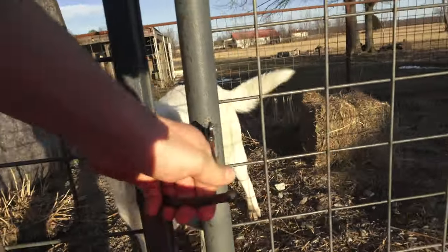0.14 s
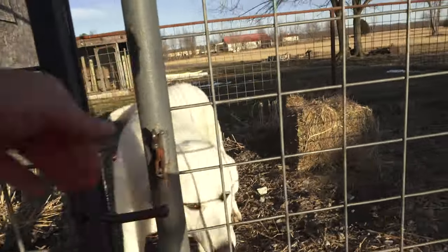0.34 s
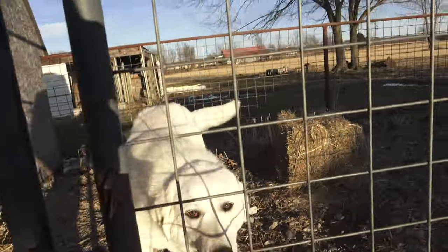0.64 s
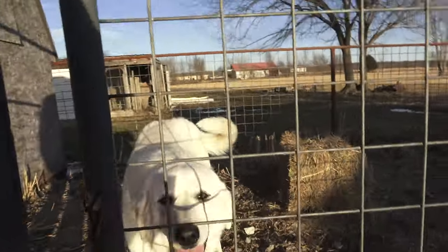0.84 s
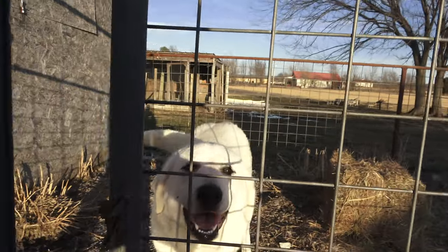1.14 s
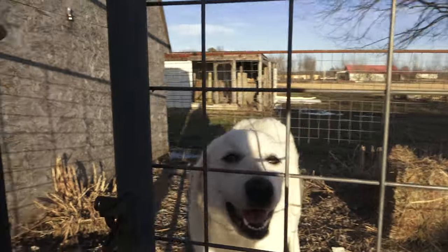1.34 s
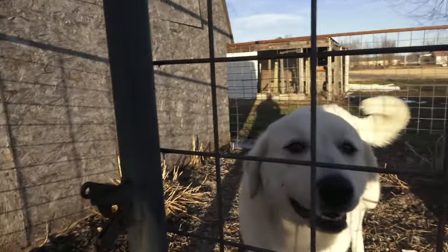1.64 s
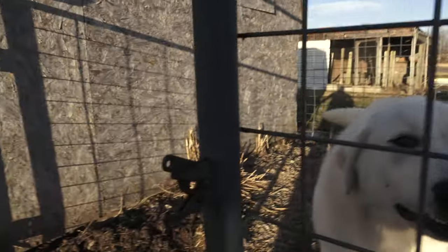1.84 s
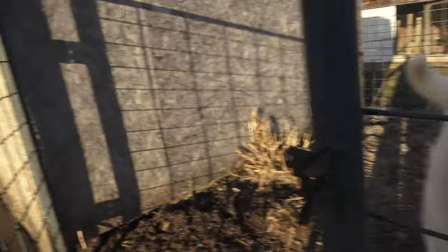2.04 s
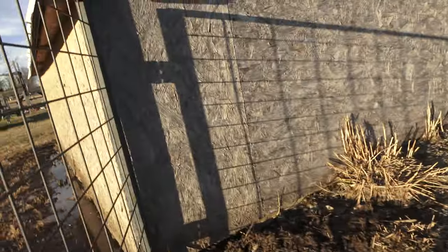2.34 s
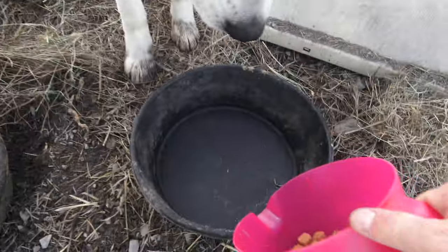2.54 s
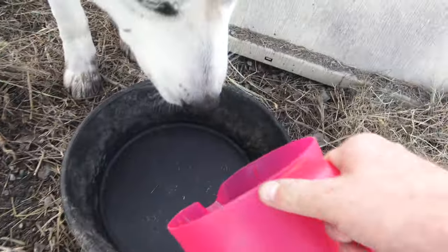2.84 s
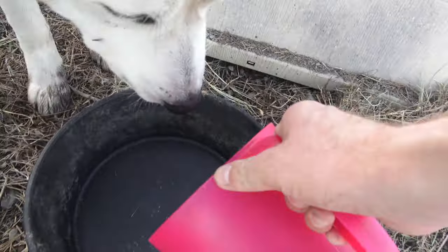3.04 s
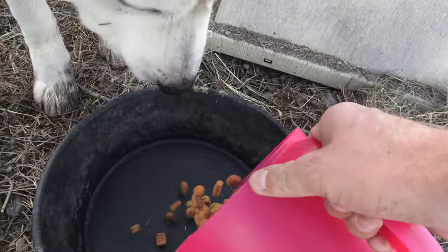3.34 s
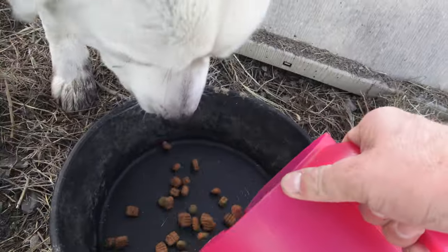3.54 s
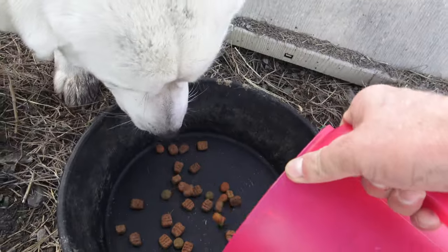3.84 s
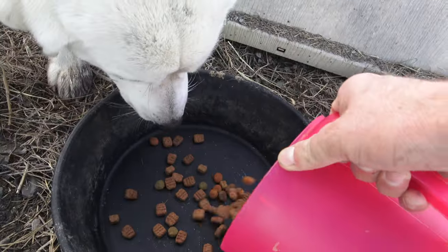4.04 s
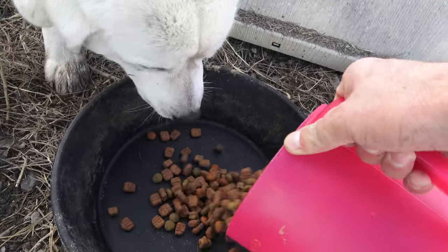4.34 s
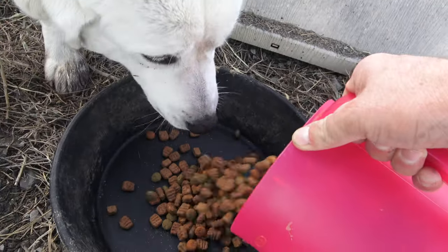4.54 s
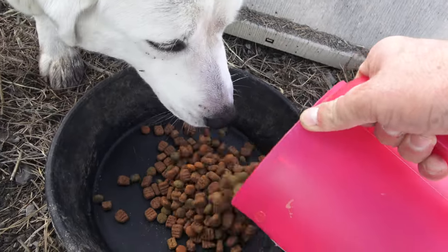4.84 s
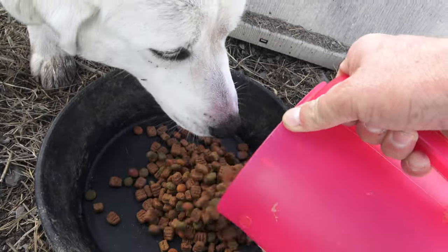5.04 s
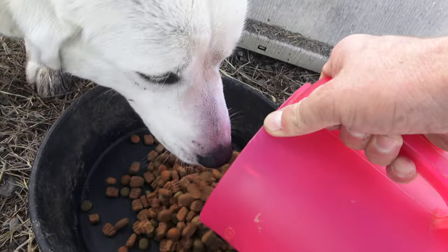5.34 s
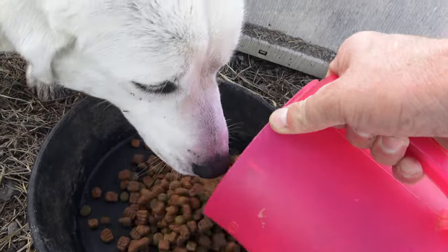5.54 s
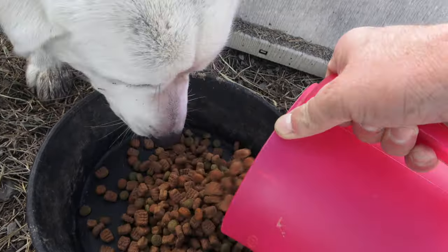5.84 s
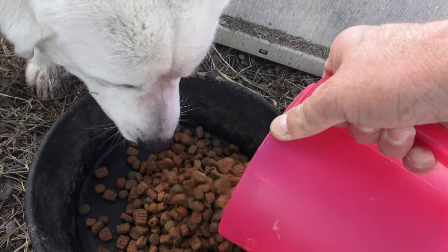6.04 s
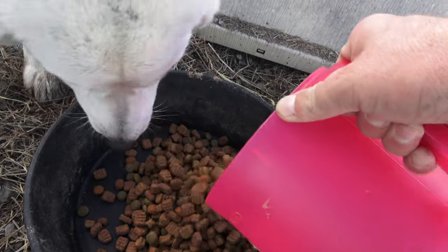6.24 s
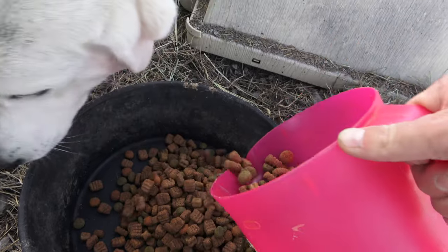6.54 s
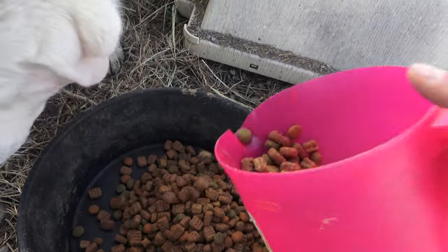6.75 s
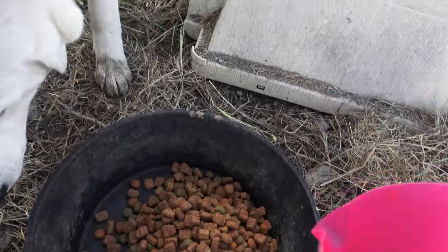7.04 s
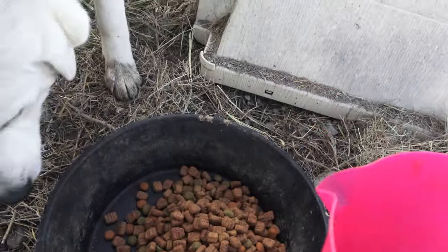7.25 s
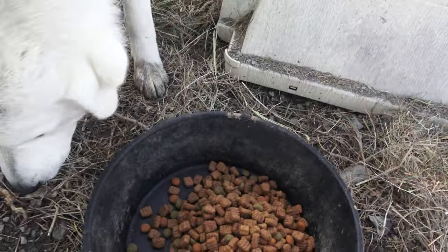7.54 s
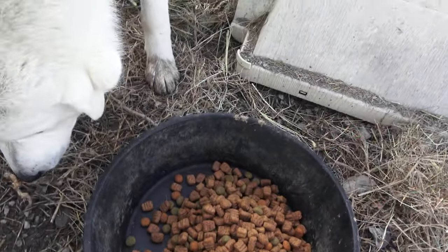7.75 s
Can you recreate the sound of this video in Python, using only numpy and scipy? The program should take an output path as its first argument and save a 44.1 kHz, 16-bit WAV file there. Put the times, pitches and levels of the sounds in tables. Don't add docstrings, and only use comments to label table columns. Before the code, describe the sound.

Outdoors, close handheld microphone with wind rumble and buffets. Dry pellets shake in a plastic scoop, a steel latch drops with a short clack, and more jolts rattle the load. The scoop tips with sharp plastic clacks, then pellets pour into a rubber pan, first as separate dull thuds, then a dense crunchy rattle that thins out. The scoop lifts away and the remaining pellets slide back inside it.

```python
import sys
import numpy as np
from scipy import signal
from scipy.fft import rfft, irfft, next_fast_len
from scipy.io import wavfile
from scipy.ndimage import uniform_filter1d

SR = 44100
rng = np.random.default_rng(int(sys.argv[2]) if len(sys.argv) > 2 else 0)


def log_audio(samples):
    frames = np.atleast_2d(samples).T
    limited = np.clip(frames, -1, 1)
    pcm = np.round(limited * 32767).astype(np.int16)
    wavfile.write(sys.argv[1], SR, pcm)


def to_linear_factor(level_db):
    exponent = np.asarray(level_db, float) / 20
    return 10 ** exponent


N = 347447

# t/s, level/dB
BREEZE = [(0, -30), (1.2, -28), (1.5, -27), (2.0, -34), (2.5, -30.5), (2.9, -36), (3.9, -35.5), (4.9, -46),
          (5.5, -46.5), (6.9, -43.5), (7.88, -41.5)]
# t/s, hold/s, level/dB
GUSTS = [
    (.13, 0.049, -9.5),
    (1.17, 0.0087, -2.5),
    (1.65, 0.083, -18),
    (1.79, 0.018, -12.5),
    (1.99, 0.018, -14.5),
]
# t/s, hold/s, level/dB
SWAYS = [
    (1.8, 0.019, -8),
    (2.1, 0.26, -11),
    (2.6, 0.11, -10.5),
    (5.08, .01, -21),
]
# t/s, hold/s, level/dB
GRIP_KNOCKS = [
    (0, 0.0042, -9.5),
    (3.93, 0.032, -27),
    (7.31, 0.0098, -26),
]
# f/Hz, level/dB
YARD_SPECTRUM = [(59, -54), (100, -16), (150, -7.5), (206, -6.5), (471, -11), (705, -17), (1230, -23.5),
                 (4200, -35.5), (16000, -57)]
# t/s, level/dB
YARD_FADE = [(5.5, 4.5), (7.88, -9)]
# start t/s, end t/s, f/Hz, width/Hz, level/dB
HUMS = [
    (0, 0.504, 2030, 200, -42),
    (0.093, 1.15, 235.2, 2.7, -42),
    (4.6, 7.95, 138.3, 4.2, -48.5),
]
# t/s, level/dB
LATCH = [
    (.447, -5.5),
]
# f/Hz, level/dB, t60/s
LATCH_BAR = [(1060, 8.5, 0.0069), (1640, -8, 0.024), (2120, -2, 0.017), (2550, 1, 0.015), (3400, -7, 0.018)]

# f/Hz, level/dB, t60/s
PAN = [(435, -4, 0.04), (452, -1, 0.044), (516, 5.5, 0.034), (580, 3, 0.039), (650, -3.5, 0.037),
       (750, -5, 0.0083), (772, -1.5, 0.032), (900, -24, 0.016)]
# f/Hz, level/dB, t60/s
SCOOP = [(554, -11, 0.047), (652, -1.5, 0.02), (705, -2, 0.018), (792, 1.5, 0.025), (830, -11.5, 0.04),
         (982, -19, 0.058)]
# f/Hz, t60/s
SCOOP_AIR = (316, 0.096)
# f/Hz, level/dB, t60/s
WALL = [(1270, -3.5, 0.012), (1556, 5, 0.0048), (1920, -2.5, 0.011), (2306, 5, 0.0047), (2650, -5.5, 0.014),
        (2970, 2, 0.0054), (3300, 1.5, 0.0068), (3820, 1, 0.004), (4370, -1, 0.0042), (5090, 3.5, 0.0026)]
# f/Hz, level/dB, t60/s
TICK = [(5900, 2.5, 0.0011), (8240, -13, 0.0023), (10700, 0, 0.0005), (13400, -26, 0.001)]

# t/s, level/dB
BUMPS = [
    (0.246, -5.5),
    (1.087, -8.5),
    (1.532, -9),
    (2.298, -17),
    (6.88, -2.5),
]
# t/s, peak level/dB
SNAPS = [(3.0816, -25), (3.12, -21.5), (3.191, -23), (3.3384, -20), (3.36, -13), (3.3954, -19),
         (3.421, -14), (3.433, -19), (3.4715, -21), (3.4907, -19), (3.5505, -11), (3.6129, -12.5),
         (3.629, -15), (3.713, -24), (3.746, -22), (3.757, -16), (3.8205, -31), (3.833, -20), (3.9087, -12),
         (3.9425, -20), (4.006, -27), (4.0657, -13.5), (4.1607, -22), (4.1873, -9), (4.1995, -15),
         (4.267, -25), (4.242, -15), (4.359, -11), (4.428, -8), (4.453, -7.5), (4.5745, -13.5),
         (4.5927, -16), (4.607, -9), (4.6528, -8), (4.679, -11), (4.74, -19), (4.7818, -17), (4.79, -8.5),
         (4.8448, -7.5), (5.0176, -17), (5.146, -19), (5.1663, -14), (5.2276, -22), (5.3028, -8),
         (5.3515, -17), (5.395, -12), (5.785, -15), (6.207, -14), (6.435, -16), (6.459, -25), (6.494, -17),
         (6.6392, -14.5), (6.7065, -23), (6.88, -28), (7.121, -9), (7.386, -45), (1.232, -26),
         (1.8305, -19), (1.878, -19), (1.8908, -12), (2.0365, -28), (2.0914, -31.5), (2.7638, -20),
         (1.371, -11)]
# t/s, peak level/dB
THINNING = [(5.4394, -27), (5.53, -22), (5.6194, -20), (5.6391, -30), (5.7249, -25), (5.8506, -27),
            (5.949, -18), (6.0294, -19), (6.077, -25), (6.1095, -25), (6.1593, -17), (6.2692, -25),
            (6.2967, -25), (6.353, -18), (6.385, -19), (6.3924, -25), (6.6214, -30), (6.7804, -34),
            (6.79, -33), (6.8065, -25), (6.8272, -20)]
# t/s, thud peak level/dB, tick level/dB re thud
DROPS = [(3.368, 8, -23), (3.397, 2.5, -28), (3.435, -2, -30), (3.468, 4, -30), (3.507, 3.5, -27),
         (3.576, -1.5, -17), (3.624, 5, -28), (3.712, 2.5, -33), (3.789, -3, -38), (3.836, 4.5, -16.5),
         (3.907, 5.5, -35), (3.942, 2.5, -36), (4.006, 7.5, -27), (4.052, 1, -28), (4.078, 7, -29),
         (4.142, 1, -28), (4.162, -9, -26), (4.258, 3.5, -35), (4.298, 0, -33), (4.39, 4, -22),
         (4.63, 3.5, -23), (4.665, 0, -27), (4.7654, 5, -31), (3.721, 1, -34), (3.664, -3, -31),
         (3.556, 0, -26), (3.643, 2, -21), (5.478, -3.5, -50), (5.68, -0.5, -34), (5.825, -2.5, -44),
         (6.271, -4.5, -29), (6.659, -5, -27), (6.991, -8, -9), (7.069, -0.5, -38)]
# t/s, peak level/dB
LANDINGS = [(3.403, 2), (3.454, 4.5), (3.545, -3.5), (3.696, -7), (4.022, 0), (4.031, -3), (4.042, 1),
            (4.098, -5), (4.174, 1), (4.2, 5), (4.222, -4), (4.239, -3), (4.277, -4), (4.308, -2),
            (4.437, -5), (4.496, 0), (4.538, 0.5), (4.587, -11), (4.805, -2.5), (4.829, -9), (4.849, 0),
            (5.04, -5), (5.195, -2), (5.24, 0), (5.364, -20), (5.391, -9), (5.547, -3), (5.736, -3),
            (5.768, -6.5), (5.802, -13.5), (5.919, -3.5), (6.123, -4.5), (6.141, -6), (6.352, -9.5),
            (6.418, -9), (6.475, -10), (6.554, -7), (6.572, -12), (6.711, -6.5), (7.02, -24),
            (7.035, -10.5), (7.119, -12)]
# t/s, clack peak level/dB, clack f/Hz, thud and tick level/dB re clack
CARRY = [(0.4337, -15, 2560, -14, -12), (0.6983, -16, 2430, -19, -15), (0.7642, -21, 4360, 9, 1),
         (0.8066, -13, 1370, 5, -9), (0.821, -7, 2500, 1, -21), (1.729, -7.5, 2420, -24, -30),
         (2.14, -25, 1460, 3, -28)]
TIPPING = [(2.5988, -0.5, 3620, 0, -6.5), (2.64, -0.5, 3100, -4, -8.5), (2.6571, -1.5, 3480, -2.5, -17),
           (2.678, -9, 3040, -4, -28), (2.7905, -5.5, 2900, -6, -31), (2.835, -2, 3020, -4.5, -13),
           (2.8691, -10, 2900, 3, -36.5), (2.897, -14.5, 2650, 4, -32.5), (2.9692, -10, 1560, 4.5, -26),
           (3.0151, -7, 1620, 7.5, -39), (3.061, 0, 2590, 5, -36), (3.1053, -3.5, 3200, 6, -41),
           (3.1208, 1, 1920, -1, -11.5), (3.1909, 1.5, 2960, -23, -23), (3.206, 3.5, 3150, -22, -13),
           (3.223, -1, 3000, -21, -22), (3.247, 0.5, 2970, -35, -20), (3.26, 1, 2880, 2.5, -23),
           (3.27, -1, 3020, -12, -22), (3.2964, 2, 2830, -1, -32), (3.311, -13.5, 2870, 19.5, -18),
           (3.3357, -1, 2970, -16, -25), (3.3895, 0.5, 2800, -3.5, -36), (3.4327, 1, 2000, -7, -31)]
POUR = [(3.5453, -6, 1870, 1, -11), (3.7125, -2.5, 1680, -24, -25),  (3.7573, 2, 2490, -8, -21),
        (3.8218, -3.5, 2560, -3, -12), (3.9069, -3, 2430, 2.5, -27), (3.97, -5, 2050, 1, -28),
        (5.2696, -1.5, 1640, 1, -32), (5.2932, 0.5, 2630, -6, -31), (5.322, -3, 2740, -11, -25),
        (5.357, -13, 2440, -8, -9), (5.5122, -4.5, 2330, -9.5, -31), (5.58, -5.5, 2380, -16, -23),
        (6.076, -3, 2770, -24, -38), (6.1733, -4, 2370, -2.5, -35), (6.235, -7, 1920, -22, -21)]
LAST = [(6.436, -9, 1970, -17, -14), (6.4588, -17, 3240, -7, -13.5), (6.611, -6.5, 2600, -17, -31),
        (6.6386, -1, 2440, -24, -23), (6.6826, -12.5, 2620, -22, -23), (6.8804, -11, 2280, -3, -21),
        (7.078, -8, 1620, 4, -31), (7.095, -7, 3830, 9, -22), (7.1064, -5.5, 2890, 6, -20),
        (7.129, -11.5, 2380, 13, -38), (7.178, -5.5, 3050, 4.5, -40), (7.2172, -2, 1650, -18, -16),
        (7.2544, -2.5, 2530, -30, -42), (7.2984, 0, 2000, -21, -49), (7.3601, -7.5, 3240, 0.5, -46),
        (7.4047, -9, 1600, -3, -45), (7.5653, -28.5, 1740, -10, -33), (7.6254, -28.5, 2450, -1, -44)]
# t/s, peak level/dB, f/Hz
SHAKEN = [(0.1352, -13, 1300), (0.156, -21.5, 2080), (0.3539, -17, 2030), (0.4758, -20, 2010),
          (0.919, -17, 1310), (0.964, -3, 2370), (0.9724, -8, 2400), (1.038, -21.5, 3090),
          (1.171, -37, 2600), (1.211, -25, 3650), (1.304, -19, 3120), (1.328, -20, 2620),
          (1.3395, -16, 1210), (1.3559, -1.5, 1270), (1.366, -7, 1620), (1.3855, -9, 3400),
          (1.614, -23, 3090), (1.8172, -14.5, 1270), (1.876, -22, 3000), (1.8944, -9, 3400),
          (1.917, -17, 2170), (2.0336, -14.5, 2860)]
# t/s, peak level/dB, f/Hz
STREAMING = [(3.0835, -10, 3180), (2.611, -9, 3200), (2.6195, -10, 4000), (2.625, -8, 3260),
             (2.648, -9, 3520), (2.69, -6.5, 3200), (2.7147, -14.5, 2730), (2.763, -16, 3170),
             (2.846, -7, 2900), (2.861, -24, 3800), (3.1484, 2.5, 2760), (3.3416, 1, 3060),
             (3.358, 1.5, 2500), (3.401, -3, 1910), (3.479, -5, 1310), (3.493, -5, 2660),
             (3.6413, -4.5, 1330), (3.9236, -9, 2620), (3.982, -4.5, 2800), (4.0228, -7, 1860),
             (4.05, -4.5, 2800), (4.1125, -5, 3160), (4.1254, -4, 2760), (4.294, -8, 3850),
             (4.363, -5, 1730), (4.5072, -6, 1440), (4.647, -7, 2650), (4.836, -5, 2890),
             (4.9222, -13, 3180), (4.978, -8, 1640), (5.233, -14, 1450), (5.477, -5, 1440),
             (5.4946, -13, 2390), (5.6878, -4.5, 1390), (5.7179, -5, 2380), (5.851, -5, 1600),
             (5.9376, -7, 1970), (6.13, -11, 1900), (6.213, -10, 2580), (6.337, -11, 1330),
             (6.779, -19, 2650), (6.825, -18, 3900), (7.194, -5, 2650), (7.233, 0.5, 2780),
             (7.244, -6, 3000), (7.2685, -11, 2370), (7.3153, -3, 2090), (7.327, -10, 1560),
             (7.395, -19, 1550), (7.602, -33, 1510), (7.684, -33, 2320)]

# t/s, collisions/per s, share landing in the pan/0-1, scoop air level/dB
FLOW = [(0, 4550, 0.09, -14.5), (2.58, 4540, 0.01, -14.5), (2.62, 470, 0.03, -15), (3.28, 1020, 0.06, -15),
        (3.4, 500, 0.76, -31), (4.0, 740, 0.6, -41), (4.4, 1590, 0.53, -12), (6.3, 630, 0.23, -12),
        (6.95, 440, 1, -4.5), (7.06, 1500, 0, -2.5), (7.4, 1200, 0.1, -1.5), (7.5, 2900, 0.1, -1),
        (7.88, 2500, 0.02, -12)]
# t/s, level/dB
SETTLING = [(0, -19), (.2, -31.5), (.62, -33), (.9, -32.5), (1.5, -31), (2.4, -43), (2.47, -36),
            (2.95, -32), (3.3, -35.5), (6.98, -32.5), (7.42, -40.5), (7.52, -41.5), (7.88, -48.5)]
# t/s, hold/s, level/dB, depth in the scoop/dB
JOLTS = [(0, 0.03, -24, -10), (.33, 0.033, -38.5, -8), (.818, 0.0071, -22.5, -2), (.8, 0.093, -32, 2),
         (.958, 0.035, -22, 0.5), (1.335, 0.051, -26, 2), (1.875, 0.051, -23.5, 2.5),
         (2.01, 0.038, -34.5, -3), (2.143, 0.013, -37.5, 0), (2.215, 0.028, -46, 5), (2.34, 0.01, -44, -4),
         (2.605, 0.098, -34, 14.5), (2.84, 0.034, -43, 18.5), (6.77, 0.057, -34, 11)]
# t/s, hold/s, level/dB, depth in the scoop/dB
SHIFTS = [(1.05, 0.031, -34, 5), (1.22, 0.097, -44.5, 9), (1.59, 0.07, -33, -18), (1.68, 0.04, -28.5, -12),
          (1.81, 0.035, -28, -11), (2.47, 0.11, -37, 6.5)]
# t/s, hold/s, level/dB, depth in the scoop/dB
SLIDES = [
    (3.13, 0.21, -21, 3.5),
    (7.1, 0.13, -17, 3),
    (7.27, 0.059, -21, 3),
]
# t/s, level/dB, meeting pellets or lip rather than rubber/dB
STREAM = [(3.27, -78, -13), (3.42, -16.5, -34), (3.5, -8, -20), (3.62, -15, -21.5), (3.69, -14.5, -50),
          (3.8, -18, -11), (3.97, -22, -9), (4.1, -12.5, -13.5), (4.38, -10, -12), (4.65, -13.5, -9),
          (4.87, -11.5, -10), (5.15, -18.5, -7), (5.28, -14, -6.5), (5.42, -16.5, -8.5), (6.2, -20, -6),
          (6.3, -23, -11), (6.76, -29, -24), (6.98, -105, -11)]
# t/s, tick level/dB re clack
HEAP = [(3.65, -28), (3.7, -38), (3.95, -26), (4.3, -22)]
# t/s, treble level/dB
AWAY = [(6.99, -1.5), (7.05, -6.5), (7.4, -5)]


def rms_one(x):
    return x / np.sqrt(np.mean(x ** 2) + 1e-20)


def in_time(rows):
    s, *columns = np.transpose(rows)
    return [np.interp(np.arange(N) / SR, s, c) for c in columns]


def coloured(x, spectrum):
    hz, db = np.transpose(spectrum)
    size = next_fast_len(N)
    log_hz = np.log(np.arange(size // 2 + 1) * SR / size + 1)
    return irfft(rfft(x, size) * to_linear_factor(np.interp(log_hz, np.log(hz), db)), size)[:N]


def band(x, low_hz, high_hz, order=2):
    return signal.sosfilt(signal.butter(order, [low_hz, high_hz], "band", fs=SR, output="sos"), x)


def drift(rate_hz):
    knots = rng.standard_normal(4000)
    return np.interp(np.arange(N) * rate_hz / SR, np.arange(4000), knots)


def evened(x, seconds):
    return x / np.sqrt(uniform_filter1d(x ** 2, int(seconds * SR)) + 1e-12)


def swells(rows, rise_db_per_s, fall_db_per_s):
    t = np.arange(N) / SR
    power = np.zeros(N)
    for s, hold, db in rows:
        below_db = np.maximum((s - t) * rise_db_per_s, (t - s - hold) * fall_db_per_s)
        power += to_linear_factor(db - np.maximum(below_db, 0)) ** 2
    return np.sqrt(power)


def ring(clicks, hz, t60):
    r, w = to_linear_factor(-60 / (t60 * SR)), 2 * np.pi * hz / SR
    return signal.lfilter([0, np.sin(w)], [1, -2 * r * np.cos(w), r * r], clicks + 1e-18)


def strike(clicks, modes, spread_db, flips, patchy_db=0):
    luck = to_linear_factor(spread_db * rng.standard_normal(N)) * np.sign(rng.random(N) - flips)
    shifting_db = patchy_db * drift(rate_hz=18)
    out = np.zeros(N)
    for k, (hz, db, t60) in enumerate(modes):
        gain = to_linear_factor(db + np.roll(shifting_db, 30011 * k))
        out += ring(clicks * gain * np.roll(luck, 977 * k), hz, t60)
    return out


def thuds(clicks, pan_share, air_db):
    pan = strike(clicks * np.sqrt(pan_share), PAN, spread_db=3.0, flips=.12)
    scoop = strike(clicks * np.sqrt(1 - pan_share), SCOOP, spread_db=3.0, flips=.12)
    boom = ring(clicks * to_linear_factor(air_db), *SCOOP_AIR)
    return band(pan, 404, 1054) + band(scoop, 510, 1214, order=3) + band(boom, 255, 428)


def chatter(noise):
    return band(strike(noise, WALL, spread_db=3.0, flips=.45), 1060, 4570)


def wind():
    brown = signal.lfilter([1], [1, -.998], rng.standard_normal((3, N)))
    parts = band(brown[0], 9.4, 18.07, order=3), band(brown[1], 18.4, 47.4, order=3), band(brown[2], 33.0, 150)
    breeze_db, = in_time(BREEZE)
    gusts = swells(GUSTS, 223, 223)
    swing = np.hypot(to_linear_factor(breeze_db + 13.5), swells(SWAYS, 71, 71))
    buffet = np.hypot(to_linear_factor(breeze_db), gusts)
    flutter = np.hypot(to_linear_factor(0.72 * breeze_db - 10.5), to_linear_factor(-17.5) * gusts)
    flutter = np.hypot(flutter, swells(GRIP_KNOCKS, 408, 408))
    return sum(gain * evened(part, seconds=0.1) for gain, part in zip((swing, buffet, flutter), parts))


def yard():
    level_db = -44 + in_time(YARD_FADE)[0] + 1.5 * drift(rate_hz=6.7)
    return to_linear_factor(level_db) * rms_one(coloured(rng.standard_normal(N), YARD_SPECTRUM))


def hums():
    out, t = np.zeros(N), np.arange(N) / SR
    for start, end, hz, width_hz, db in HUMS:
        tone = evened(band(rng.standard_normal(N), hz - width_hz / 2, hz + width_hz / 2), seconds=0.064)
        fade = np.clip(np.minimum(t - start + 0.047, end - t) / 0.052, 0, 1)
        out += to_linear_factor(db + 2.2 * drift(rate_hz=25)) * tone * fade
    return out


def latch():
    clicks = np.zeros(N)
    for s, db in LATCH:
        clicks[round(s * SR)] = to_linear_factor(db - 5.0)
    return band(sum(ring(clicks * to_linear_factor(db), hz, t60) for hz, db, t60 in LATCH_BAR), 1020, 3000)


def bumps():
    clicks = np.zeros(N)
    for s, db in BUMPS:
        clicks[round(s * SR)] = to_linear_factor(db - 8.0)
    return band(ring(clicks, hz=353, t60=0.044), 290, 370)


def snaps():
    t = np.arange(900) / SR
    burst = np.zeros(N + 900)
    for s, db in SNAPS + THINNING:
        burst[round(s * SR):][:900] += to_linear_factor(db + 6.5 - 60 * t / 0.0053) * rng.standard_normal(900)
    burst = burst[:N]
    return band(burst, 2700, 6710) + to_linear_factor(-12.5) * band(burst, 6400, 9700, order=1)


def rubber_landings(pan_share, air_db):
    t = np.arange(900) / SR
    low, knock, wall, high = np.zeros((4, N + 900))
    for s, db, tick_db in DROPS + [(s, db, -30.0) for s, db in LANDINGS]:
        i = round(s * SR)
        noise = rng.standard_normal(900)
        hz = 544 * to_linear_factor(1.8 * noise[0])
        low[i] += to_linear_factor(db - 14.0)
        knock[i:i + 900] += to_linear_factor(min(db, 0) - 7.5 - 60 * t / 0.018) * np.sin(2 * np.pi * hz * t)
        wall[i:i + 900] += to_linear_factor(db - 42.0 - 60 * t / 0.01) * noise
        high[i:i + 900] += to_linear_factor(db + tick_db + 6 - 60 * t / 0.0027) * noise
    body = band(knock[:N], 370, 2300) + thuds(low[:N], pan_share, air_db)
    return body + chatter(wall[:N]) + band(high[:N], 3600, 11000)


def clear_hits(pan_share, air_db):
    plain = [(s, db, hz, -14.0, -26.0) for s, db, hz in SHAKEN + STREAMING]
    t = np.arange(900) / SR
    clack, wall, low, high, knock = np.zeros((5, N + 900))
    for s, db, hz, thud_db, tick_db in np.concatenate([CARRY, TIPPING, POUR, LAST, plain]):
        i = round(s * SR)
        noise = rng.standard_normal(900)
        t60 = 0.0075 * to_linear_factor(2.2 * noise[1])
        attack = np.minimum(t / 0.0005, 1)
        clack[i:i + 900] += to_linear_factor(db - 60 * t / t60) * attack * np.sin(2 * np.pi * hz * t)
        wall[i:i + 900] += to_linear_factor(db - 27.5 - 60 * t / 0.02) * np.minimum(t * hz / 4, 1) * noise
        low[i] = to_linear_factor(db + thud_db - 13.5)
        scoop_knock = to_linear_factor(db + thud_db - 12.5 - 60 * t / 0.012) * np.sqrt(1 - pan_share[i])
        knock[i:i + 900] += scoop_knock * np.sin(2 * np.pi * 780 * t)
        high[i:i + 900] += to_linear_factor(db + tick_db + 5.5 - 60 * t / 0.0021) * noise
    body = band(knock[:N], 370, 2300) + thuds(low[:N], pan_share, air_db)
    return clack[:N] + body + chatter(wall[:N]) + band(high[:N], 3600, 11000)


def moves(rows, rise_db_per_s, fall_db_per_s, tick_db):
    s, hold, db, depth_db = np.transpose(rows)
    thud = swells(zip(s, hold, db + depth_db), rise_db_per_s, fall_db_per_s)
    clack = swells(zip(s, hold, db), rise_db_per_s, fall_db_per_s)
    return np.array([thud, clack, to_linear_factor(tick_db) * clack])


def vigour():
    (rest_db,), (stream_db, hard_db), (heap_db,) = in_time(SETTLING), in_time(STREAM), in_time(HEAP)
    blend_db = np.cumsum([0, -8.5, -21.5])[:, None]
    rest = to_linear_factor(rest_db + 1.66 * drift(rate_hz=18) + blend_db)
    stream = to_linear_factor(np.cumsum([stream_db, hard_db, heap_db], axis=0))
    jolts = moves(JOLTS, 1400, 848, tick_db=-18.5)
    slides = moves(SLIDES, 230, 222, tick_db=-31)
    shifts = moves(SHIFTS, 300, 300, tick_db=-20)
    thud, clack, tick = np.sqrt(rest ** 2 + stream ** 2 + jolts ** 2 + slides ** 2 + shifts ** 2)
    return thud, clack, tick * to_linear_factor(in_time(AWAY)[0])


def rattle(per_s, pan_share, air_db):
    thud_gain, clack_gain, tick_gain = vigour()
    sizes = to_linear_factor(3.17 * np.minimum(rng.exponential(1, N), 3.6)) * rng.choice([-1, 1], N)
    clicks = sizes * (rng.random(N) < per_s * to_linear_factor(4.0 * drift(rate_hz=70)) / SR)
    dust = rng.standard_normal(N)
    thud = evened(thuds(clicks + 0.063 * dust, pan_share, air_db), seconds=0.17)
    wall = strike(clicks + 0.11 * dust, WALL, spread_db=4.0, flips=.45, patchy_db=5.0)
    lip = ring(clicks * (1 - pan_share) * to_linear_factor(-2.0), hz=3060, t60=0.0048)
    clack = evened(band(wall + lip, 1000, 5740), seconds=0.1)
    dull = band(clack, 990, 4860, order=3)
    clack = dull + to_linear_factor(in_time(AWAY)[0]) * (clack - dull)
    tick = strike(clicks + 0.088 * dust, TICK, spread_db=3.0, flips=0.37, patchy_db=6.0)
    tick = evened(band(tick, 3400, 17400), seconds=0.14)
    return to_linear_factor(-1.5) * thud_gain * thud + to_linear_factor(1.0) * clack_gain * clack + to_linear_factor(8.5) * tick_gain * tick


def scene():
    per_s, pan_share, air_db = in_time(FLOW)
    pan_share = np.clip(pan_share, 0, 1)
    near = latch() + bumps() + snaps() + rubber_landings(pan_share, air_db)
    near = near + clear_hits(pan_share, air_db) + rattle(per_s, pan_share, air_db)
    dull = band(near, 160, 4200, order=1)
    echoes = to_linear_factor(-19.0) * np.roll(dull, round(.0043 * SR)) + to_linear_factor(-20.5) * np.roll(dull, round(0.017 * SR))
    return (wind() + yard() + hums() + near + echoes)[None]


def low_pass(x):
    return signal.sosfilt(signal.butter(12, 16530, fs=SR, output="sos"), x)


def record(dry):
    dry = signal.sosfilt(signal.cheby2(14, 45, 16000, fs=SR, output="sos"), dry)
    mix = np.clip(dry, -1.0, 1.0)
    return low_pass(mix)


dry = scene()
out = record(dry)
log_audio(out)
```